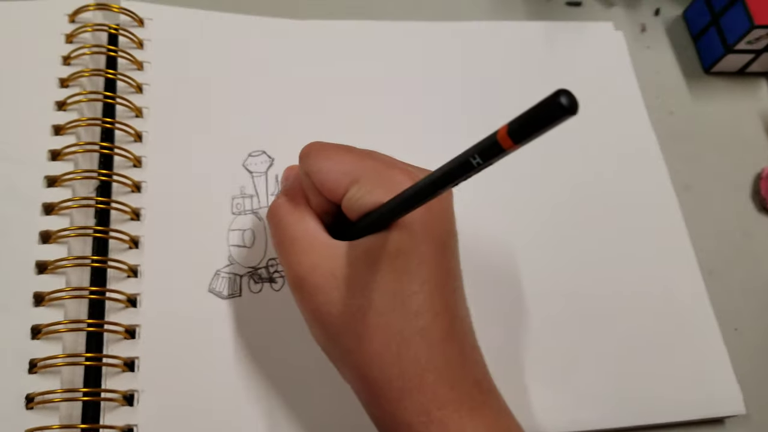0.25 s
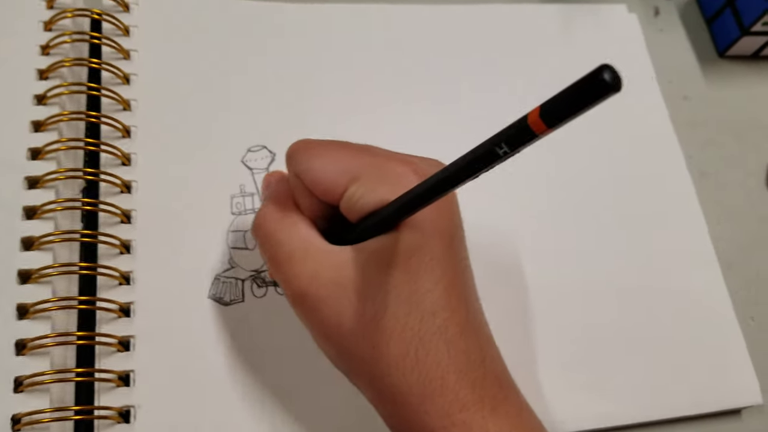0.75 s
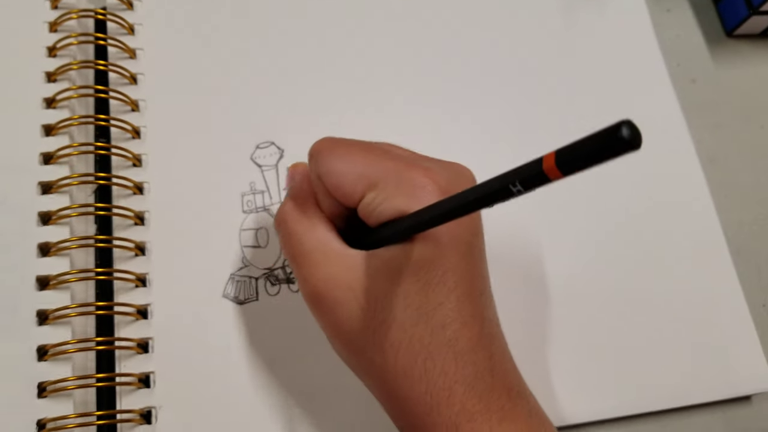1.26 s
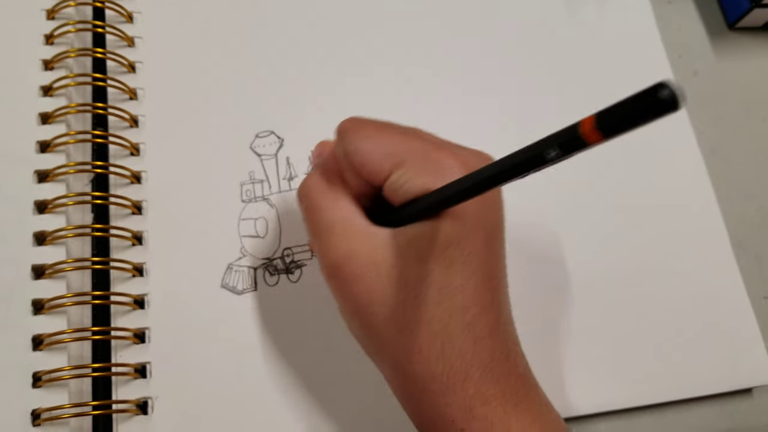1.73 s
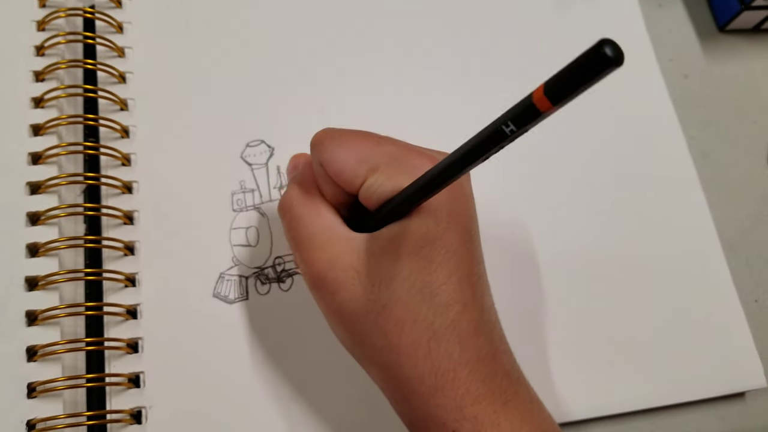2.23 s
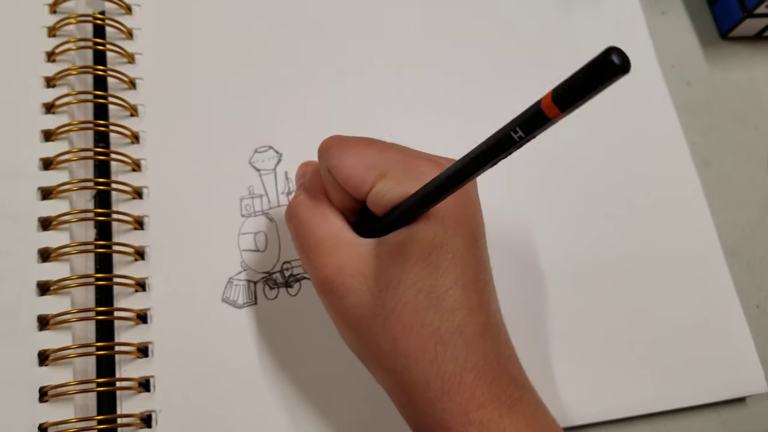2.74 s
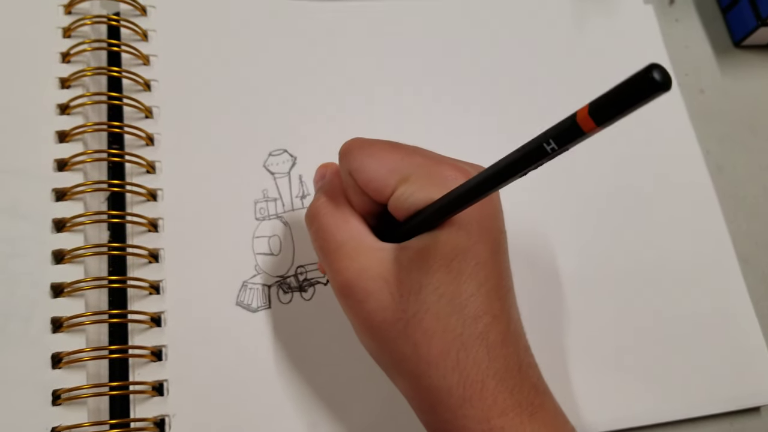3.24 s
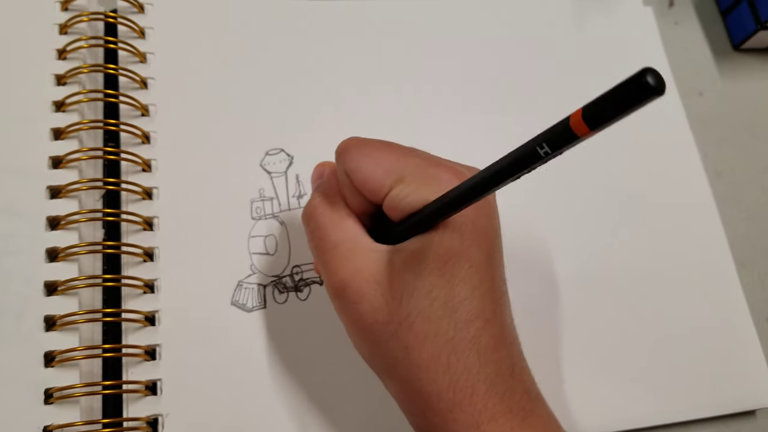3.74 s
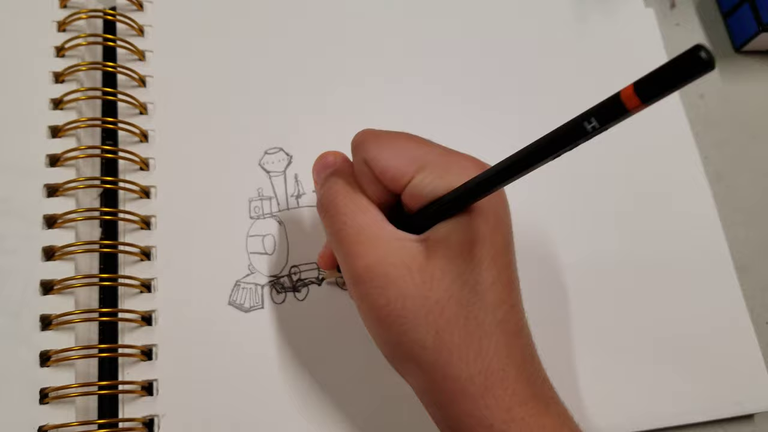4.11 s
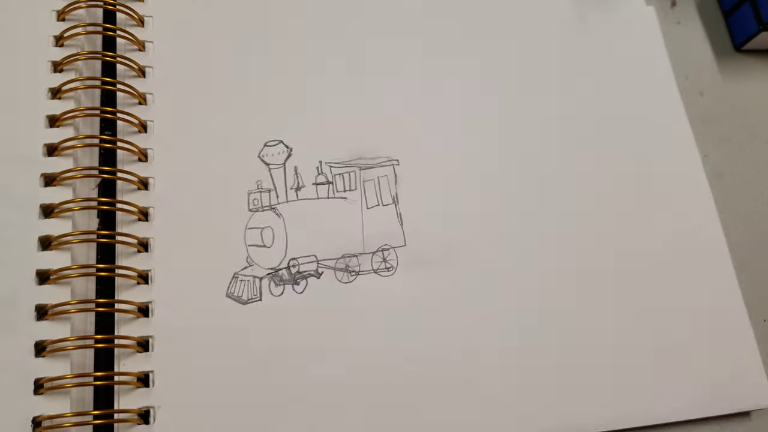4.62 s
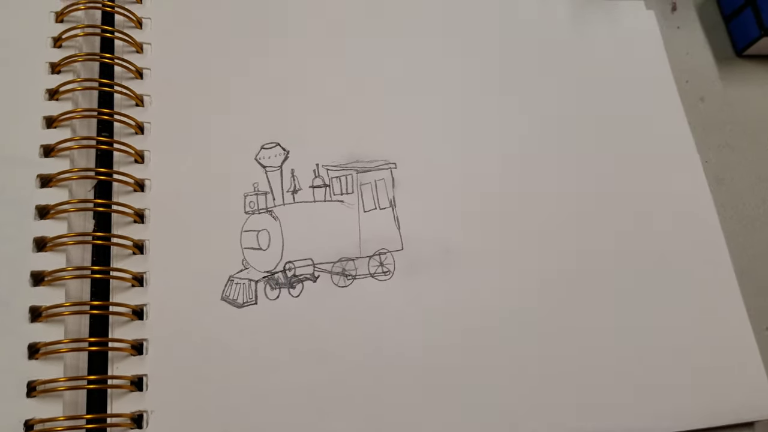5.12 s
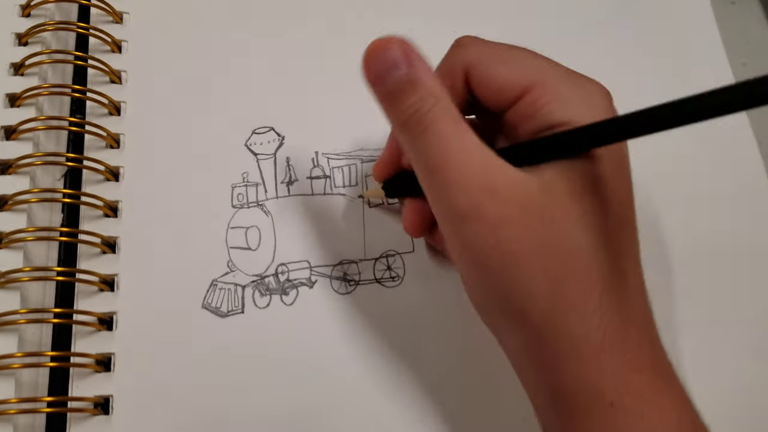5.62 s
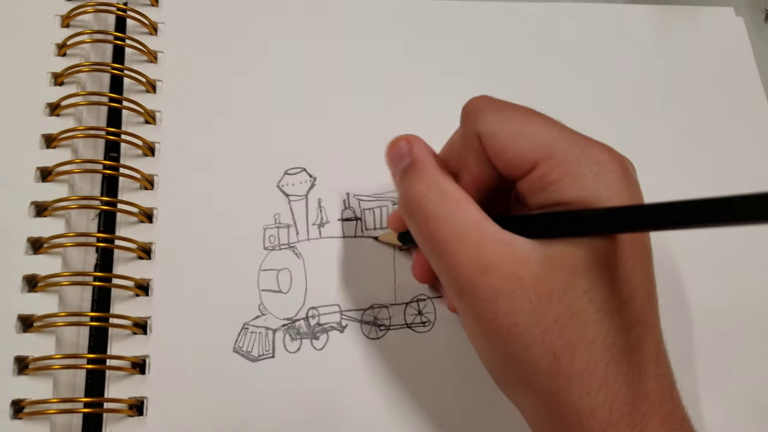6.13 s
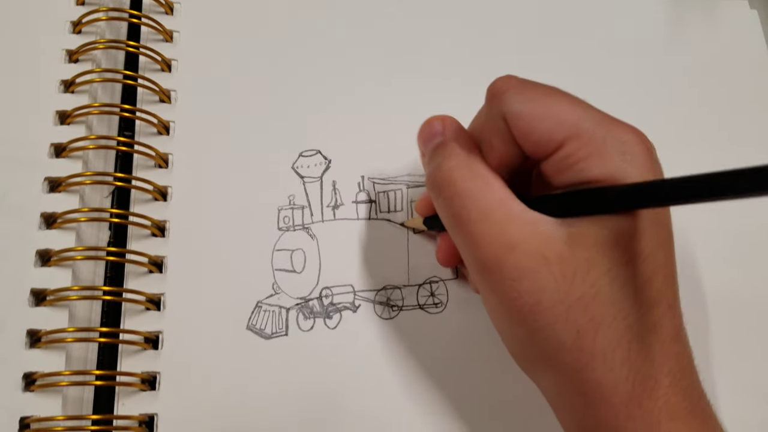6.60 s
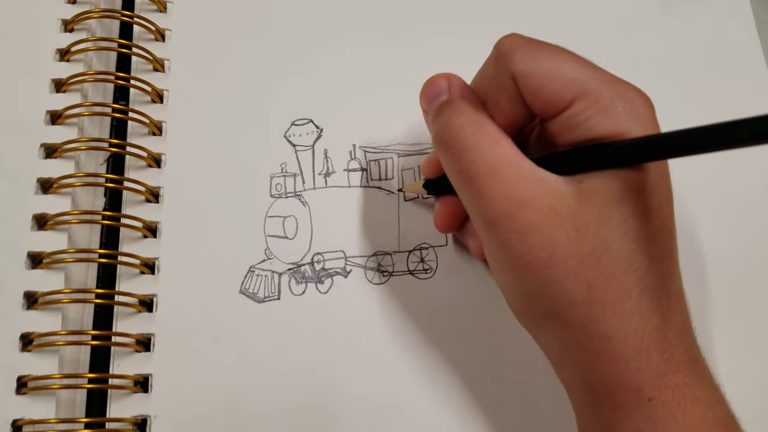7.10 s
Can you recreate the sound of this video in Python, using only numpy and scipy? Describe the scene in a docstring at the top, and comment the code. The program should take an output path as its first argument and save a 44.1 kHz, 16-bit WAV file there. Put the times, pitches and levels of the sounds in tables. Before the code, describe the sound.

Fingers rub and knock loudly against the microphone, then a pencil scratches short strokes on paper; a dull thud and ringing clink interrupt before sketching resumes.

```python
"""In a quiet room, a pencil sketches short lines in a spiral pad, close to a hand-held pair of microphones.
At first the holding fingers rub beside the microphone ports and knock: filtered noise and ringing clicks.
The pencil is random slips exciting resonances; the drawing hand leaves and returns with a flatter grip.
Farther off, something clunks, and later, just after a dull low thud, something hard is set down with a
ringing clink: clumped grains and ringing modes. Faint narrow-band swells, air rumble and hiss lie below."""
import sys
import numpy as np
from scipy import signal
from scipy.fft import rfft, irfft, next_fast_len
from scipy.io import wavfile
from scipy.ndimage import map_coordinates

SR = 44100
rng = np.random.default_rng(int(sys.argv[2]) if len(sys.argv) > 2 else 0)


def unload_wav(signal):
    """Save mono or channel-first audio to the path in sys.argv[1] as 16-bit WAV at rate SR, clipped to [-1, 1]."""
    wavfile.write(
        sys.argv[1],
        SR,
        np.round(np.clip(np.atleast_2d(signal).T, -1, 1) * 32767).astype(np.int16),
    )


N = 324563
TIME = np.arange(N) / SR   # seconds


def from_db(db):
    """Decibels to gain."""
    return 10 ** (np.asarray(db) / 20)


def rms_one(x):
    """Scale to an rms of 1."""
    return x / np.sqrt(np.mean(x ** 2) + 1e-20)


def at_hz(points, hz):
    """Read a table of (Hz, value) on a log-frequency axis."""
    points = np.array(points)
    return np.interp(np.log(hz + 1), np.log(points[:, 0]), points[:, 1])


def fft_grid():
    """A fast transform size for the whole scene, and the frequencies of its bins."""
    size = next_fast_len(N)
    return size, np.arange(size // 2 + 1) * SR / size


def panned(left_db):
    """Gains of the two channels for a left-right difference in dB, with a mean power of 1."""
    return rms_one(from_db([[left_db / 2], [-left_db / 2]]))


def butter(x, hz, kind, order=2):
    """Causal Butterworth filter."""
    sections = signal.butter(order, np.clip(hz, 10, .48 * SR), kind, fs=SR, output="sos")
    return signal.sosfilt(sections, x + 1e-18)


def drift(rate):
    """Slow chance: straight lines between normal draws of spread 1, `rate` draws per second."""
    knots = rng.standard_normal(N // 20)
    return np.interp(TIME * rate, np.arange(len(knots)), knots)


def wander(x, rate, share):
    """Let the resonances of a sound drift up and down by a share of their pitch."""
    place = np.cumsum(1 + share * drift(rate))
    return np.array([map_coordinates(side, [place], order=3, mode="wrap") for side in x])


def coloured(x, spectrum):
    """Give a noise the spectrum of a table; rms 1."""
    size, hz = fft_grid()
    return rms_one(irfft(rfft(x, size) * from_db(at_hz(spectrum, hz)), size)[..., :N])


LEFT_LEAD_S = .00016   # paired sound reaches the left microphone first


def paired(x, likeness):
    """Mix two unrelated noises so that left and right agree as the table says, the right a little late."""
    size, hz = fft_grid()
    alike = np.clip(at_hz(likeness, hz), -1, 1)
    mid, side = rfft(x, size) * np.sqrt([1 + alike, 1 - alike])
    right_delay = np.exp(-2j * np.pi * hz * LEFT_LEAD_S)
    return irfft([mid + side, (mid - side) * right_delay], size)[:, :N]


def ring(x, hz, t60):
    """A unit click sets a sine of height 1 ringing."""
    radius = from_db(-60 / (t60 * SR))
    angle = 2 * np.pi * hz / SR
    return signal.lfilter([0, np.sin(angle)], [1, -2 * radius * np.cos(angle), radius ** 2], x + 1e-18)


def resonate(x, hz, width_hz):
    """A broad resonance with steep skirts, from two equal sections; rms 1."""
    radius = np.exp(-np.pi * width_hz / SR)
    section = [1, 0, -1, 1, -2 * radius * np.cos(2 * np.pi * hz / SR), radius ** 2]
    return rms_one(signal.sosfilt([section, section], x + 1e-18))


def grains(per_s, spread_db):
    """Tiny impulses at random moments and of uneven size, in two channels; rms 1."""
    sizes = from_db(spread_db * np.minimum(rng.exponential(1, N), 4))
    happens = rng.random(N) < per_s / SR
    return rms_one(happens * sizes * rng.standard_normal((2, N)))


RISE_SHARE = .44   # part of an arch spent rising
SWELL_SHAPE = 2.4   # power the arch is raised to; lower is flatter on top


def bell(middle, length):
    """An arch, as of a hand's speed: it rises quickly from rest, peaks and comes to rest more slowly."""
    phase = (TIME - middle) / (length * np.where(TIME < middle, RISE_SHARE, 1 - RISE_SHARE))
    during = np.abs(phase) < 1
    speed = np.zeros(N)
    speed[during] = np.cos(np.pi / 2 * phase[during]) ** SWELL_SHAPE
    return speed


# Left-right likeness of the room air, the clumped bursts and the shuffles.
# Each row: frequency in Hz, correlation.
AIR_LIKENESS = [(60, .9), (140, 1), (300, 0.34), (700, 0.33), (1500, 0.06)]
# Colour of the low ventilation rumble. Each row: frequency in Hz, relative level in dB per Hz.
AIR_COLOUR = [(25, -29.5), (45, -5), (62, 0.5), (80, -6.5), (120, -7.5), (165, -16), (230, -21.5),
              (400, -25), (800, -40.5), (1800, -39.5), (4000, -48.5), (7000, -71)]
# Colour of the microphones' own hiss. Each row: frequency in Hz, relative level in dB per Hz.
HISS_COLOUR = [(2800, -25.5), (4200, -8.5), (5200, -2.5), (6200, -12), (8600, -20), (9700, -15.5),
               (10600, -3.5), (12200, -1), (13800, 1), (16000, -5)]


def room_air(air_db, hiss_db):
    """Low ventilation rumble, slightly unsteady and to the left, and the steady hiss of the microphones."""
    rumble = coloured(paired(rng.standard_normal((2, N)), AIR_LIKENESS), AIR_COLOUR)
    rumble = rumble * from_db(1.0 * drift(rate=9.9)) * panned(2.1)
    hiss = coloured(rng.standard_normal((2, N)), HISS_COLOUR)
    return from_db(air_db) * rumble + from_db(hiss_db) * hiss


# Faint, brief swells of narrow-band noise. Each row: loudest moment in seconds, length in seconds,
# centre in Hz, level in dB before the shared left-right balance.
NARROW_SWELLS = [(3.313, 0.14, 1640, -70.5), (4.378, 0.071, 606, -66.5), (4.989, .3, 1712, -77)]


def narrow_swells(width_hz):
    """Noise through one resonance rises and falls, faintly and briefly."""
    noise = rng.standard_normal((2, N))
    out = 0
    for middle, length, hz, db in NARROW_SWELLS:
        out = out + from_db(db) * bell(middle, length) * resonate(noise, hz, width_hz)
    return out


def build_and_decay(start_s, rise_s, t60):
    """A level that builds up smoothly and dies away exponentially."""
    age = np.maximum(TIME - start_s, 0)
    return (1 - np.exp(-(age / rise_s) ** 2)) * from_db(-60 * age / t60)


def clumped_burst(colour, start_s, rise_s, t60, level_db):
    """A burst of many separate coloured grains, arriving in clumps, that builds up and dies away."""
    noise = coloured(paired(grains(per_s=7000, spread_db=-0.5), AIR_LIKENESS), colour)
    clumps = from_db(level_db + 0.66 * drift(rate=130))
    return clumps * noise * build_and_decay(start_s, rise_s, t60)


# Colour of the clink's bright splash. Each row: frequency in Hz, relative level in dB per Hz.
CLINK_COLOUR = [(2200, -10.5), (2700, 5), (3300, 6), (3750, 2.5), (4100, 11.5), (4500, -1.5), (6800, -4),
                (8400, -17), (9800, -1.5), (12900, -2), (14000, -14), (16000, -2.5)]
# Ringing modes of the clinking thing. Each row: frequency in Hz, relative level in dB, t60 in seconds.
CLINK_MODES = [(3236, 0, 0.33), (4020, -7, 0.61), (4170, -6, 0.63), (9490, -5.5, 0.38), (10570, 0, 0.27),
               (12250, -3, 0.24), (12934, 4, 0.3), (13100, 7, 0.28)]


def clink(start_s, rise_s, ring_db, blur_hz, flutter_db):
    """A bright splash of sound and its ringing modes, which blur and flutter along the room's many paths."""
    paths = rng.standard_normal((2, N))
    tones = 0
    for hz, db, t60 in CLINK_MODES:
        tones = tones + from_db(db) * build_and_decay(start_s, rise_s, t60) * resonate(paths, hz, blur_hz)
    flutter = from_db(ring_db + flutter_db * drift(rate=75))
    splash = clumped_burst(CLINK_COLOUR, start_s, rise_s, t60=0.47, level_db=-37.5)
    return flutter * tones + splash


# Colour of the far clunk. Each row: frequency in Hz, relative level in dB per Hz.
CLUNK_COLOUR = [(130, -29), (220, 4), (350, -10.5), (480, -3), (760, -3.5), (1100, -16.5), (1320, -5.5),
                (1650, -11.5), (2000, -16), (2550, -19), (3200, -35), (4400, -31), (6000, -43.5)]
# Colour of the dull low thud just before the clink. Each row: frequency in Hz, relative level in dB per Hz.
THUD_COLOUR = [(70, 7), (160, 11), (280, 0.5), (500, 3), (1000, -14.5), (2400, -17.5), (5000, -40)]
# Balance shared by these sounds. Each row: frequency in Hz, left-right difference in dB (positive is left).
SHARED_BALANCE = [(200, 2), (1300, -4), (2400, -1.5), (4400, 2.5), (8100, -6)]


def clunk_thud_and_clink():
    """A far clunk, a dull low thud and a clink, with narrow swells, share one left-right balance by frequency."""
    sounds = clumped_burst(CLUNK_COLOUR, start_s=3.122, rise_s=0.017, t60=0.46, level_db=-39.0)
    sounds += clumped_burst(THUD_COLOUR, start_s=4.555, rise_s=0.0029, t60=0.25, level_db=-35.5)
    sounds += clink(start_s=4.576, rise_s=0.019, ring_db=-45.5, blur_hz=55, flutter_db=-1.0)
    sounds += narrow_swells(width_hz=240)
    size, hz = fft_grid()
    left_db = at_hz(SHARED_BALANCE, hz)
    return irfft(rfft(sounds, size) * from_db([left_db / 2, -left_db / 2]), size)[:, :N]


# The heel of the hand shuffles on the pad. Each row: fastest moment in seconds, length in seconds, level in dB.
SHUFFLES = [(0.941, 0.062, -43), (1, 0.35, -50.5)]
# Colour of the shuffling. Each row: frequency in Hz, relative level in dB per Hz.
SHUFFLE_COLOUR = [(50, -14), (100, 6), (170, 2.5), (330, -5), (550, -21.5), (1200, -82)]


def shuffles():
    """Skin drags over the pad, which passes on only a dull rumble."""
    drag = sum(from_db(db) * bell(middle, length) for middle, length, db in SHUFFLES)
    return drag * coloured(paired(rng.standard_normal((2, N)), AIR_LIKENESS), SHUFFLE_COLOUR)


RUB_ATTACK_S = 0.0072


def slide(start, length, release_t60):
    """A finger takes hold quickly, slides evenly and lets go."""
    age = TIME - start
    hold = np.clip(age / RUB_ATTACK_S, 0, 1)
    return hold * from_db(-60 * np.clip((age - length) / release_t60, 0, 2))


# Fingers slide on the recorder, right at the microphones. Each row: start in seconds, length in seconds,
# level in dB before panning, rumble against that level in dB, lower edge of the hiss in Hz,
# left-right difference in dB, release t60 in seconds.
RUBS = [(-.005, 0.031, -47.5, -7.5, 950, -0.5, 0.049), (0.028, 0.036, -51.5, -1.5, 1200, 4.5, 0.41),
        (0.112, 0.066, -52.5, 2.5, 1807, 13, 0.42), (0.268, 0.04, -56.5, 1, 1800, 6.5, 0.17),
        (0.315, 0.049, -50.5, 8, 450, -4, .07), (0.378, .057, -33.5, -3.5, 700, 14.5, 0.034),
        (0.444, 0.05, -57.5, 6, 1300, 9, 0.19)]
# Colour of the skin hiss. Each row: frequency in Hz, relative level in dB per Hz.
RUB_COLOUR = [(700, 0), (1300, 3), (1900, 0), (2450, 4.5), (3100, -4.5), (4200, -6.5), (4900, -18),
              (7000, -19.5), (9000, -26), (11500, -24), (16000, -30)]


def finger_rub(uneven_db, firm_db, crunch_hz):
    """Skin hisses by each port, its colour shifting as the finger rolls; firm pressure crunches, the case rumbles."""
    skin = wander(coloured(grains(per_s=7500, spread_db=1.5), RUB_COLOUR), rate=30, share=.03)
    skin = skin * from_db(uneven_db * drift(rate=89))
    crunch = rms_one(butter(grains(per_s=4500, spread_db=1.0), [850, crunch_hz], "band"))
    rumble = butter(rng.standard_normal((2, N)), [90, 230], "band", order=1)
    rumble = rms_one(butter(rumble, 870, "low"))
    out = 0
    for start, length, db, rumble_db, edge_hz, left_db, release in RUBS:
        pressure = from_db(db) * slide(start, length, release) * panned(left_db)
        light = np.minimum(pressure, from_db(firm_db))   # the pressure beyond this turns to crunch
        out = out + light * rms_one(butter(skin, edge_hz, "high"))
        out = out + (pressure - light) * crunch
        out = out + pressure * from_db(rumble_db) * rumble
    return out


# Knocks of fingers on the recorder and of hand and pencil on the pad. Each row: time in seconds,
# thump level in dB, thump cutoff in Hz, crack peak in dB, sway against the thump in dB,
# left-right difference in dB. Levels are before panning.
KNOCKS = [(0.2004, -19.5, 170, -35.5, -14, 30), (0.2887, -32.5, 700, -54, -17, -19),
          (0.303, -37.5, 1200, -49, -18, 13.5), (0.3209, -14, 377, -28.5, -25.5, -10),
          (0.3755, -38, 1400, -24, -20, 29), (0.3988, -22.5, 160.9, -10, -20.5, 25.5),
          (.409, -13.5, 260, 2.5, -19, 25), (0.4146, -21, 220, -8.5, -20.5, 14.5),
          (0.4444, -8, 1200, -14.5, -24.5, 23), (4.5334, -12.5, 375, -44.5, -31, -17.5),
          (4.567, -33, 300, -70, -12, -4), (5.118, -50.5, 520, -70.5, -15, -2),
          (5.63, -70, 896, -52, -17, .5), (6.167, -55, 900, -72, -25, -1)]
# The recorder's case rings briefly with every crack.
# Each row: frequency in Hz, relative level in dB, t60 in seconds.
CASE_MODES = [(2000, -5, 0.0075), (3230, 4, 0.0024), (5730, 3, 0.0017), (12200, -23.5, 0.0054)]
# The recorder sways in the hand after a knock. Each row: frequency in Hz, relative level in dB, t60 in seconds.
SWAY_MODES = [(91.5, -0.5, .11), (199, -1, 0.11)]
NO_SUCTION_HZ = 1430   # suction shrinks as the thump cutoff rises, and is gone here


def knocks(suction, suction_hz, release_s, hollow_hz, hollow_db, hollow_t60, sway_after_s):
    """A knock is a brief suction and slower release, a hollow note, a crack of the case and a short low sway."""
    out = np.zeros((2, N))
    click = signal.unit_impulse(SR // 4)
    age = TIME[:len(click)]
    crack = sum(from_db(db) * ring(click, hz, t60) for hz, db, t60 in CASE_MODES)
    crack = crack / np.abs(crack).max()
    sway = sum(from_db(db) * ring(click, hz, t60) for hz, db, t60 in SWAY_MODES)
    sway = np.interp(age - sway_after_s, age, sway, left=0)
    hollow = from_db(hollow_db) * ring(click, hollow_hz, hollow_t60)
    pull = butter(click, suction_hz, "low")
    pull = pull / pull.max()
    for s, thump_db, thump_hz, crack_db, sway_db, left_db in KNOCKS:
        push = butter(click, thump_hz, "low")
        release = np.interp(age - release_s, age, push / push.max() + hollow, left=0)
        depth = suction * np.clip(1 - thump_hz / NO_SUCTION_HZ, 0, 1)
        thump = butter(release - depth * pull, 75, "high")
        thump = butter(thump, 1600 + thump_hz, "low", order=5)   # harder knocks reach higher
        thump = thump / np.abs(thump).max() - from_db(sway_db) * sway
        knock = from_db(thump_db) * thump + from_db(crack_db) * crack
        at = round(s * SR)
        out[:, at:at + len(click)] += knock * panned(left_db)
    return out


# Left-right likeness of the pencil, close to the pair. Each row: frequency in Hz, correlation.
PENCIL_LIKENESS = [(900, 0.18), (2400, 0.41), (6000, 0.042), (14000, 0.16)]
# How hard the hand leans on the pad, which sets its drone. Each row: time in seconds, drone gain in dB.
LEAN = [(.9, -2), (1.6, 4), (2.3, 4.5), (2.8, 0.5), (3.1, -8), (3.45, -10), (3.7, -1.34), (6.18, 2.5),
        (6.45, -2), (6.75, 0), (7.0, -2.5)]
LEAN_DULLS = 0.96   # dB per octave that tip, shaft and pad each tilt towards their lows, per dB of lean
ORDINARY_DB = -64   # tip level of an ordinary stroke


def pencil(strokes, grip, drone, balance_db):
    """Graphite catches on paper fibres; the slips excite tip, shaft and pad, swelling with each stroke's speed."""
    drone_db, drone_slope = drone
    tip = shaft = pad = 0   # powers
    for middle, length, db, rasp_db in strokes:
        speed = bell(middle, length)
        pad_db = ORDINARY_DB + drone_db + drone_slope * (db - ORDINARY_DB)
        tip += (from_db(db) * speed) ** 2
        shaft += (from_db(db + rasp_db) * speed) ** 2
        pad += (from_db(pad_db) * speed) ** 2
    lean_db = np.interp(TIME, *np.transpose(LEAN))
    pad = pad * from_db(lean_db) ** 2
    tooth = from_db(0.86 * drift(rate=78))   # the paper is rougher in places
    slips = paired(grains(per_s=7400, spread_db=3.0), PENCIL_LIKENESS)
    out = 0
    for modes, power, left_db in zip(grip, (tip, shaft, pad), balance_db):
        body = 0
        centre_hz = np.median([hz for hz, width, db in modes])
        for hz, width, db in modes:
            fibres = np.roll(slips, rng.integers(N), axis=1)   # each resonance is fed by its own patch of fibres
            tilt_db = 2 * drift(rate=8)   # and comes and goes as the pencil tilts
            octaves_below = np.clip(np.log2(centre_hz / hz), -.5, .5)
            dulling_db = LEAN_DULLS * lean_db * octaves_below
            body = body + from_db(db + tilt_db + dulling_db) * resonate(fibres, hz, width)
        body = rms_one(wander(body, rate=10, share=.022))
        out = out + body * np.sqrt(power) * panned(left_db)
    return out * tooth


def reflections(x, wet_db, t60):
    """Desk and walls return a short diffuse tail, different on each side."""
    age = TIME[:SR // 2]
    tail = rng.standard_normal((2, len(age))) * from_db(-60 * age / t60)
    tail = tail / np.sqrt(np.sum(tail ** 2, axis=1, keepdims=True))
    return from_db(wet_db) * signal.fftconvolve(x, tail, axes=1)[:, :N]


# Pencil strokes on the pad. Each row: fastest moment in seconds, length in seconds,
# hiss of the tip in dB before panning and paper roughness, rasp of the shaft against the hiss in dB.
STROKES = [(.01, 0.13, -58, -13), (0.15, 0.28, -63.5, -15), (0.347, 0.3, -60, -13.5),
           (0.461, .24, -61.5, -10), (0.682, 0.27, -65.5, -8), (0.866, 0.16, -63, -8),
           (1.03, 0.44, -67.5, -5.5), (1.192, 0.16, -63.5, -7), (1.335, 0.16, -67, -5),
           (1.478, 0.17, -60.5, -6.5), (1.593, 0.17, -71.5, -4), (1.71, 0.26, -70.5, -8),
           (2.16, 0.15, -62, -7), (2.301, 0.14, -68.5, -3), (2.464, 0.16, -68, -6),
           (2.841, 0.092, -59.5, -7.5), (2.969, 0.11, -61.5, -10), (3.093, .2, -64, -9),
           (3.33, 0.089, -64, -9), (3.461, 0.14, -66, -6.5), (3.591, 0.12, -65.5, -10),
           (3.733, 0.15, -63, -6), (3.887, .13, -71.5, -4.5), (3.969, 0.1, -67.5, -8),
           (4.389, 0.19, -70.5, -9.5), (5.61, 0.33, -73, -9), (6.196, 0.15, -62.5, -11.5),
           (6.362, 0.13, -63.5, -13), (6.492, 0.19, -61.5, -8.5), (6.638, 0.13, -63, -13),
           (6.753, 0.16, -63.5, -12.5), (6.946, .051, -69, -15), (7.015, 0.11, -65.5, -14)]
# Resonances for the upright and for the flat grip, in three lists: tip, shaft, pad.
# Each row: frequency in Hz, width in Hz, relative level in dB.
UPRIGHT = ([(11060, 900, -2), (12300, 890, -2), (14800, 2200, -2)], [(4990, 330, -4), (6200, 1500, 1)],
           [(940, 380, 1), (1240, 600, -1.5), (2380, 400, 0.5)])
FLAT = ([(11520, 1540, 0.46), (12400, 1100, -1.3), (14800, 1500, -1.3)], [(5700, 850, 1.2),
        (7300, 930, -0.79), (4310, 5300, -2)], [(915, 200, 5.5), (1130, 236, -2.5), (2390, 1330, -11.5)])
# The pad's drone follows the tip, for each grip.
# The pair: dB against the tip in an ordinary stroke, dB gained per dB of the stroke.
UPRIGHT_DRONE = (-3, 1)
FLAT_DRONE = (2.35, 2.84)
REGRIP_S = 5.0   # later strokes use the flat grip


def sketching():
    """The pencil in its upright, then its flatter grip, with the short reflections of desk and walls."""
    upright = [row for row in STROKES if row[0] < REGRIP_S]
    flat = [row for row in STROKES if row[0] > REGRIP_S]
    drawing = pencil(upright, UPRIGHT, UPRIGHT_DRONE, balance_db=(-.7, 3.0, .5))
    drawing += pencil(flat, FLAT, FLAT_DRONE, balance_db=(-1.5, 3.0, -1))
    return drawing + reflections(drawing, wet_db=-10.5, t60=0.2)


def scene():
    """The room and its events, the handling and the drawing."""
    background = room_air(air_db=-55, hiss_db=-74.5) + clunk_thud_and_clink()
    handling = shuffles() + finger_rub(uneven_db=1.5, firm_db=-46.5, crunch_hz=2650)
    handling += knocks(suction=0.76, suction_hz=800, release_s=.0007, hollow_hz=1240, hollow_db=-13,
                       hollow_t60=0.007, sway_after_s=.0035)
    return background + handling + sketching()


CUTOFF_HZ = 15800


def record(dry):
    """The microphones lose the deepest bass, full scale limits the peaks and the top is cut."""
    heard = np.clip(butter(dry, 27, "high"), -1, 1)
    return signal.sosfilt(signal.ellip(10, .1, 70, CUTOFF_HZ, fs=SR, output="sos"), heard)


dry = scene()
out = record(dry)
unload_wav(out)
```